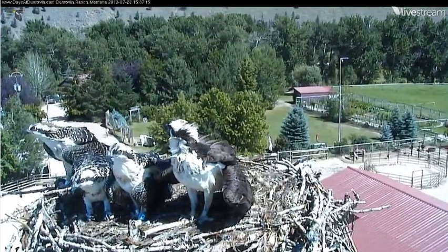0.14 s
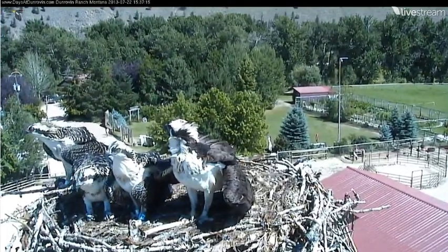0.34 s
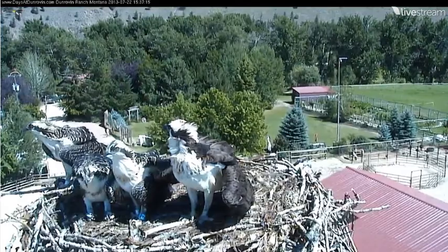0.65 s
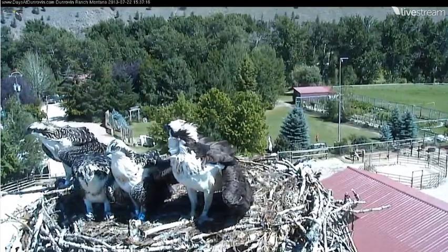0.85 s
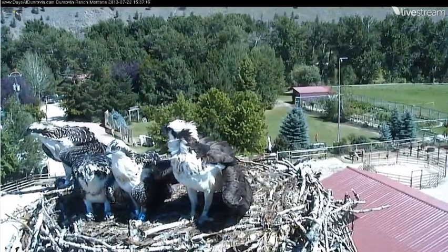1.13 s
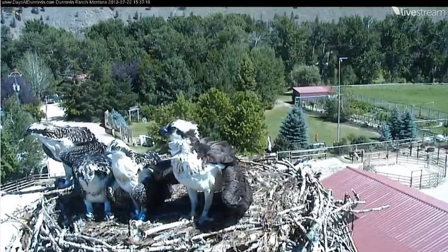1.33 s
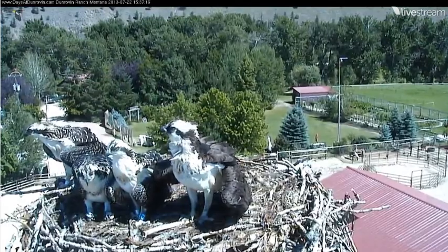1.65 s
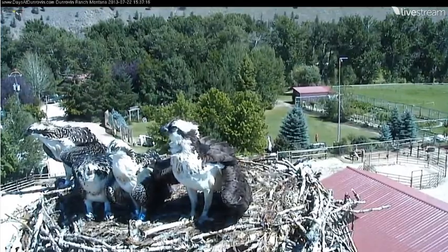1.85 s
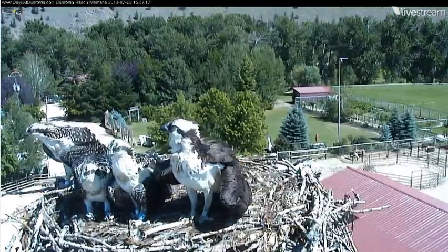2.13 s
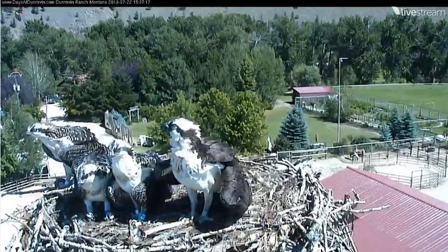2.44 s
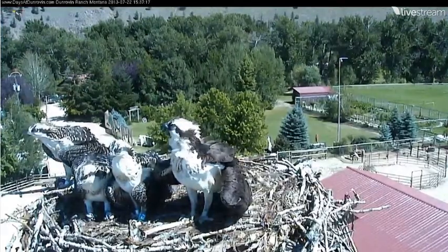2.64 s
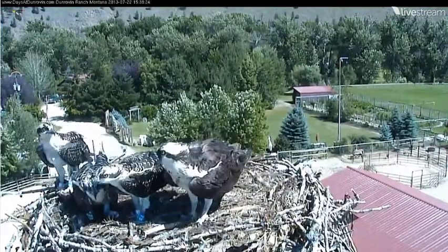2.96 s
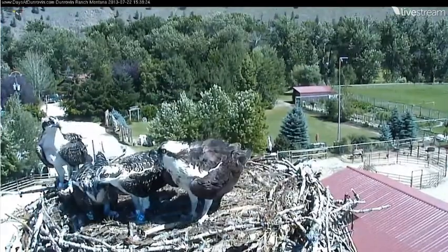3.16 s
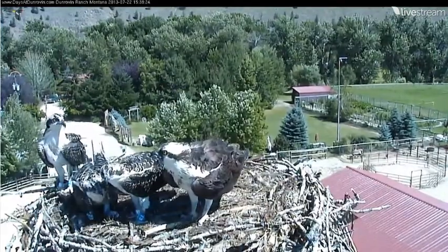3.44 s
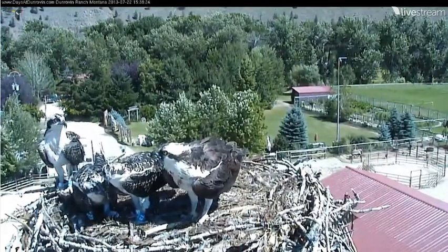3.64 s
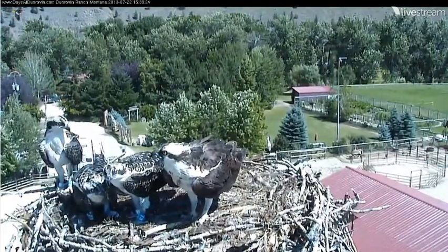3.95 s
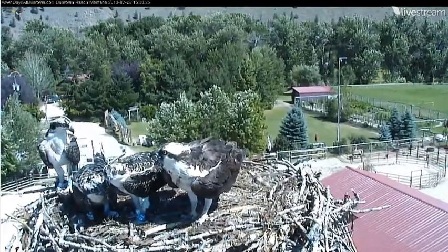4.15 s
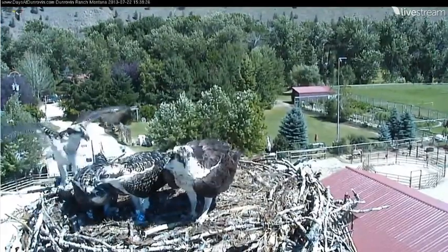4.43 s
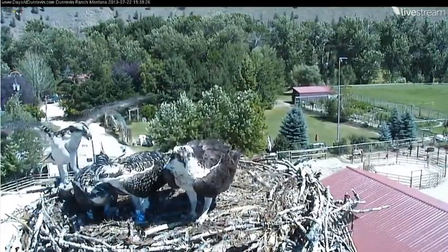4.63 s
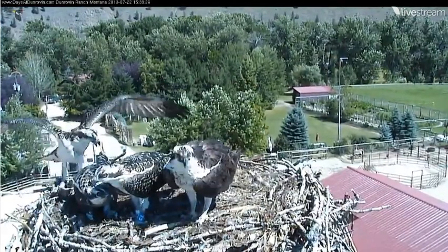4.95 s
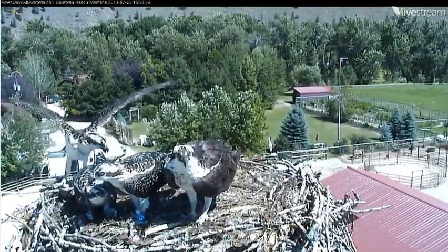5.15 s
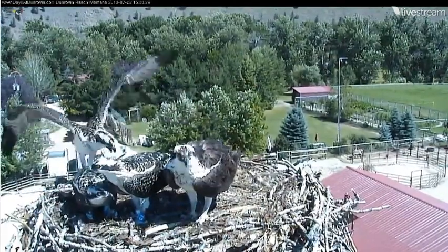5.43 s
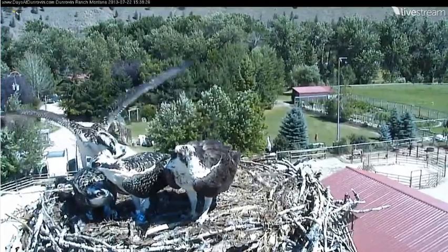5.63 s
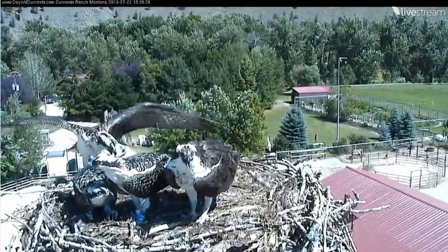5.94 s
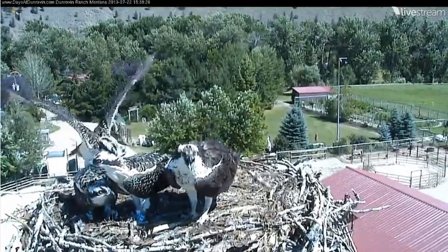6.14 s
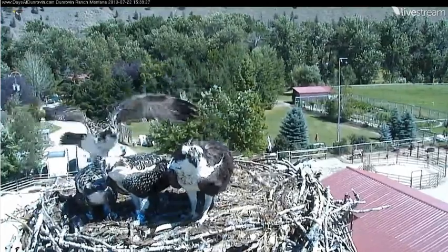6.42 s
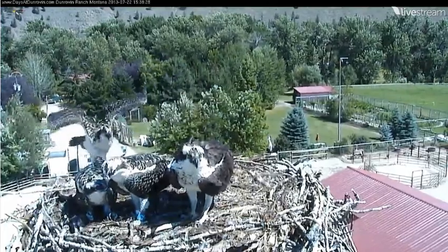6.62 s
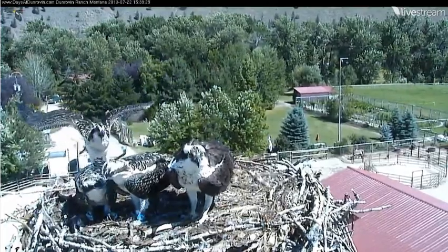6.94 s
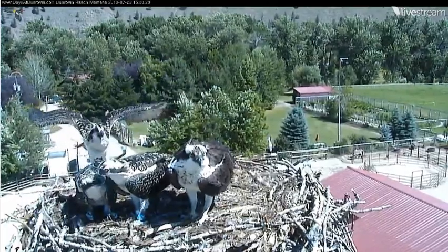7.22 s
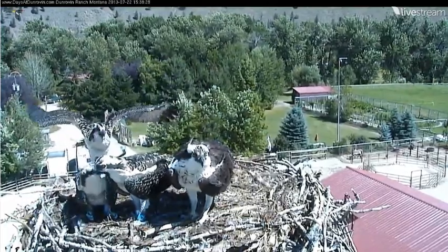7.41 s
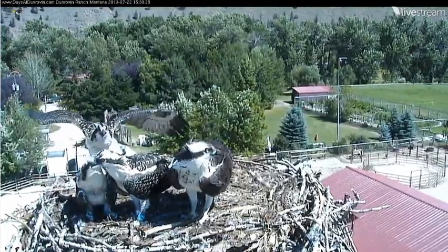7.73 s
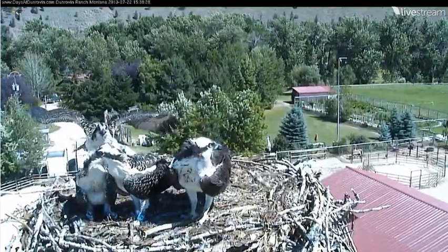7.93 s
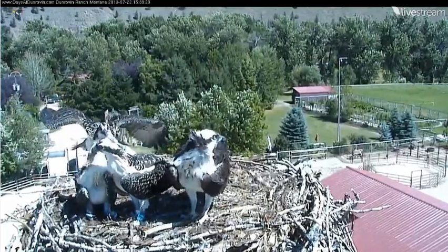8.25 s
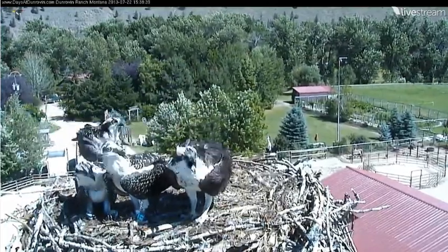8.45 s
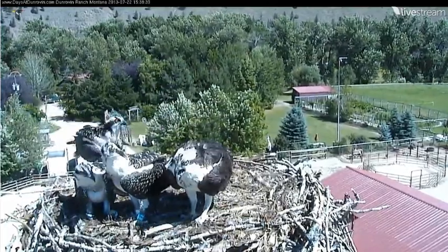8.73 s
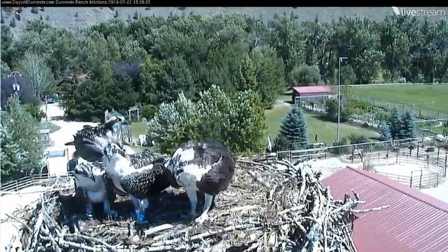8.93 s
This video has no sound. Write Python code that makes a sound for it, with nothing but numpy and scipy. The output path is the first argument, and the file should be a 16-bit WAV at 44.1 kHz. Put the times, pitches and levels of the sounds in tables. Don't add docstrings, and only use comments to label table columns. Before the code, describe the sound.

A breezy outdoor nest heard through a thin, easily overloaded camera microphone: constant grainy leaf hiss, faint mains hum, low gusts. From 0 to 3 s it is sparse: a close sparrow on the left gives quick burred zigzag chirps at about 0.6 and 0.9, a loud one at 1.7, its strongest at 2.6 with a faint reply, while distant twitters and two very faint thin trills pass. At 3.2 an osprey beside the left side gives one sharp whistle; from about 3.6 short falling whistles run at six per second, first a hoarser young bird, then from 4.7 a harder adult with small peeps between, then the young again from 5.9 to 6.9, its voice cracking higher. Wind thumps softly around 3.5, 5.5 and 7.1. After a brief gap, the adult starts again at 7.1, its piercing, distorted whistles rising slightly and growing harder until 9 s. Far sparrows twitter throughout.

```python
import sys
import numpy as np
from scipy import signal
from scipy.fft import rfft, irfft, next_fast_len
from scipy.io import wavfile
from scipy.ndimage import uniform_filter1d

SR = 44100
rng = np.random.default_rng(int(sys.argv[2]) if len(sys.argv) > 2 else 0)


def bounce(signal):
    frames = np.transpose(np.atleast_2d(signal))
    limited = np.clip(frames, -1, 1)
    pcm = np.round(limited * 32767).astype(np.int16)
    wavfile.write(sys.argv[1], SR, pcm)


def makeup_ratio(level_db):
    decades = np.asarray(level_db, float) / 20
    return 10 ** decades


N = 400428
T = np.arange(N) / SR

# pitch_hz, level_db
HUM_TONES = [(120.1, -34), (240.1, -38), (360.1, -44.5), (515.8, -49), (1091.6, -43.5)]
# frequency_hz, density_db
LEAVES_LEFT = [(30, -5.5), (150, -3.5), (500, -10), (1300, -8.5), (2500, -1.5), (3400, -2.5), (4200, -14),
               (5500, -16)]
# frequency_hz, density_db
LEAVES_RIGHT = [(30, -24), (150, -7.5), (500, -9.5), (1300, -6.5), (2400, -6.5), (3200, -13), (4200, -22),
                (5500, -12)]
# frequency_hz, correlation (-1 to 1)
LEAVES_LIKENESS = [(60, -2.5), (180, 0.66), (550, 0.97), (1640, 0.9), (4950, 0.38), (14900, -0.25)]
# time_s, level_db
GUSTS = [(0.0, -49), (0.05, -56), (0.43, -45), (2.98, -52.5), (3.49, -34), (4.88, -32.5), (5.36, -29),
         (5.66, -42), (5.71, -29), (5.87, -41), (6.04, -39.5), (7.03, -43), (7.1, -26), (7.18, -32),
         (8.27, -37.5), (8.32, -47), (9.0, -31.5), (9.08, -40)]
# start_s, length_s, level_db
FAR_CHIRPS = [(0.156, 0.08, -34.5), (1.229, .12, -39), (2.419, .12, -38.5), (3.028, 0.047, -34),
              (3.463, 0.047, -35.5), (3.685, .079, -31.5), (4.036, 0.042, -28.5), (4.316, 0.028, -31.5),
              (4.804, 0.064, -30.5), (5.232, 0.098, -30), (5.597, 0.032, -24), (5.693, 0.12, -31),
              (6.106, 0.032, -30), (6.55, 0.087, -41), (6.627, 0.035, -31), (6.823, 0.018, -24),
              (6.874, 0.05, -32), (7.248, 0.021, -22), (7.405, 0.1, -41), (7.544, 0.072, -49),
              (7.685, 0.049, -43), (7.918, 0.027, -26), (8.108, 0.017, -26), (8.579, 0.062, -23),
              (8.719, 0.086, -27.5), (8.826, 0.027, -27.5)]
# start_s, length_s, pitch_hz, level_db
FAR_TRILLS = [
    (0.326, 0.23, 7830, -49.5),
    (2.31, 0.26, 7800, -50.5),
]
# time_s, pitch_hz, level_db
ZIGZAG_CURVE = [
    (0, 3400, -22),
    (.027, 3714, -16),
    (.043, 6150, -15),
    (.058, 5720, -18),
    (.086, 3000, -14),
    (.098, 3800, -10),
    (.112, 3050, -9),
    (.148, 4380, -11.5),
    (.168, 3075, -19),
]
# time_s, pitch_hz, level_db
SHOUT_CURVE = [
    (0, 4674, -6),
    (.017, 4500, -14),
    (0.03, 3265, 11),
    (0.04, 4260, -11),
    (0.043, 3033, -2),
    (0.066, 3836, 1.5),
    (.089, 2500, -2),
    (0.099, 3185, -2.5),
    (0.123, 2480, -19),
]
# start_s, length_s, level_db
ZIGZAG_CALLS = [
    (.636, 0.19, 0.5),
    (.891, .13, -8),
    (2.59, .168, 2),
    (2.787, 0.18, -12),
]
# start_s, length_s, top_hz, end_hz, chest_note_s (0 = none)
ADULT_CALLS = [(3.175, 0.066, 2676, 2476, 0), (4.679, 0.068, 2645, 2400, 0),
               (4.838, 0.063, 2826, 2563, 0.0094), (4.998, 0.058, 2904, 2553, 0.013),
               (5.16, 0.057, 2830, 2580, .013), (5.328, 0.067, 2780, 2670, 0.009),
               (5.515, 0.058, 2814, 2594, 0.016), (5.73, 0.051, 2706, 2522, 0.017),
               (7.103, 0.063, 2652, 2370, 0), (7.259, 0.064, 2790, 2520, 0.012),
               (7.417, 0.062, 2896, 2512, 0.012), (7.581, 0.058, 2833, 2610, 0.016),
               (7.743, 0.062, 2896, 2710, .011), (7.911, 0.07, 2913, 2557, 0.011),
               (8.088, 0.057, 2942, 2790, 0.02), (8.256, 0.061, 2960, 2750, 0.0084),
               (8.427, 0.065, 2960, 2804, 0.0096), (8.606, 0.064, 3037, 2837, 0.011),
               (8.784, 0.06, 3059, 2790, 0.018), (8.96, 0.061, 3046, 2953, 0.019)]
# start_s, length_s, middle_hz, level_db
PEEP_CALLS = [
    (3.573, 0.052, 2556, -5),
    (4.732, 0.041, 3110, 2.5),
    (4.897, .044, 3250, -10),
    (5.067, 0.054, 3120, -11),
    (5.229, 0.059, 3180, -10),
    (5.41, .062, 3146, -5),
    (5.592, 0.062, 2960, -5.5),
    (5.776, 0.048, 3035, -4.5),
]
# start_s, length_s, top_hz, end_hz
YOUNG_CALLS = [(3.738, 0.052, 2880, 2523), (3.895, 0.055, 2923, 2685), (4.06, 0.049, 2927, 2620),
               (4.231, 0.049, 3004, 2635), (4.392, 0.042, 3070, 2715), (4.559, 0.05, 3115, 2870),
               (5.941, 0.066, 3010, 2585), (6.103, 0.071, 3085, 2690), (6.273, .074, 3197, 2666),
               (6.445, 0.07, 3220, 2646), (6.618, 0.073, 3200, 2804), (6.802, 0.071, 2990, 2733)]
# start_s, length_s, upper_pitch_hz, level_db, whistle_dip_db
VOICE_BREAKS = [
    (4.867, .026, 3570, 3, -5),
    (5.024, 0.022, 3680, -4, -6),
    (6.301, 0.017, 3750, 6, -17),
    (6.476, .014, 3800, 8, -9),
    (6.656, .008, 3700, 4, -7),
    (7.28, .022, 3530, -1, 0.5),
    (7.44, 0.029, 3660, -2, 0),
]
# frequency_hz, level_db
RIGHT_SHADOW = [(1800, -79), (2200, -17), (2700, -36.5), (3300, -38.5), (4500, -30)]
# time_s, level_db
OVERLOAD_LEVEL = [(0, -1), (2.9, 10), (3.1, 0), (4.5, 0), (5.0, -1.5), (9.08, -1.5)]
# frequency_hz, density_db
CAMERA_HISS = [(4000, -3), (5200, 1.5), (6300, -2.5), (7500, -7.5), (9000, -11), (12800, -8), (13300, -46)]
# frequency_hz, step_db
LINK_STEP = [(200, -20.5), (2000, -26), (3300, -12), (4700, 2.5), (7500, 1), (12300, 7.5), (13900, -17),
             (15000, 15)]


def evened(x):
    return x / np.sqrt(np.mean(x ** 2) + 1e-20)


def read(points, hz):
    f, value = np.transpose(points)
    return np.interp(np.log(hz + 1), np.log(f + 1), value)


def add(mix, s, sound):
    part = mix[round(s * SR):][:len(sound)]
    part += sound[:len(part)]


def low(x, hz, size):
    taps = signal.firwin(size, hz, window=("kaiser", 6), fs=SR)
    return signal.oaconvolve(x, taps[None], "same")


def coloured(x, points):
    size = next_fast_len(N)
    gain = makeup_ratio(read(points, np.fft.rfftfreq(size, 1 / SR)))
    return irfft(rfft(x, size) * gain, size)[..., :N]


def noise(left, right, same, patchy_db):
    hz = np.fft.rfftfreq(1024, 1 / SR)
    a, b, c, d, patches = rng.standard_normal((N // 256 + 5, 513, 5)).T
    patches = uniform_filter1d(patches, size=10, axis=0)
    patches = evened(uniform_filter1d(patches, size=14, axis=1))
    like = np.clip(read(same, hz), -1, 1)[:, None]
    shared, own = a + 1j * b, c + 1j * d
    z = np.array([shared, like * shared + np.sqrt(1 - like ** 2) * own])
    shape_db = np.array([read(left, hz), read(right, hz)])[..., None]
    z *= makeup_ratio(shape_db + patchy_db * patches)
    return evened(signal.istft(z, nperseg=1024, noverlap=768)[1][:, :N])


def hum():
    tones = np.zeros(N)
    for hz, db in HUM_TONES:
        tones += np.sqrt(2) * makeup_ratio(db) * np.sin(2 * np.pi * (hz * T + rng.random()))
    return tones * makeup_ratio(np.array([[-1.5], [1.5]]))


def leaves():
    return makeup_ratio(-21) * noise(LEAVES_LEFT, LEAVES_RIGHT, LEAVES_LIKENESS, 0.75)


def wind():
    shape = [(15, -6.5), (40, -5), (100, 3.0), (250, -8.5), (600, -42)]  # frequency_hz, density_db
    likeness = [(25, 0.049), (100, 0.85), (300, 1.0)]
    gust_db = np.interp(T, *np.transpose(GUSTS)) + 2.5
    return makeup_ratio(gust_db) * noise(shape, shape, likeness, 3.7)


def twitter():
    out = np.zeros(N)
    early_hz, late_hz = 4427, 3250
    for s, length, db in FAR_CHIRPS:
        rate, start = rng.random(2)
        t = np.arange(0, length + 0.078, 1 / SR)
        wobble, burr = uniform_filter1d(rng.standard_normal((2, 12000)), size=130)[:, :len(t)]
        hz = early_hz + (late_hz - early_hz) * t / t[-1] + 180 * evened(wobble)
        hz += 450 * np.sin(2 * np.pi * ((25 + 25 * rate) * t + start))
        tone = (1.88 + evened(burr)) * np.sin(2 * np.pi * np.cumsum(hz) / SR)
        add(out, s - .015, makeup_ratio(db - 2.0) * tone * signal.windows.tukey(len(t), .6))
    return out


def trills():
    out = np.zeros(N)
    for s, length, pitch_hz, db in FAR_TRILLS:
        t = np.arange(0, length, 1 / SR)
        beat = 2 * np.pi * 52 * t
        hz = pitch_hz + 330 * np.sin(beat) - 900 * t
        tone = np.sin(2 * np.pi * np.cumsum(hz) / SR)
        add(out, s, makeup_ratio(db) * tone * (1 + 0.9 * np.cos(beat)) * signal.windows.tukey(len(t), .4))
    return out


def chirp(curve, length, db):
    catch_s, depth_db = .003, -12
    at, hz, level_db = np.transpose(curve)
    t = np.arange(0, length, 1 / SR)
    waver, burr = uniform_filter1d(rng.standard_normal((2, len(t))), size=60)
    pitch = uniform_filter1d(np.interp(t, at, hz), size=90) * (1 + 0.014 * evened(waver))
    turn = 2 * np.pi * np.cumsum(pitch) / SR
    tone = (np.sin(turn) + makeup_ratio(-44) * np.sin(2 * turn)) * (1 + .12 * evened(burr))
    bottoms = at[1:-1][(hz[1:-1] < hz[:-2]) & (hz[1:-1] < hz[2:])]
    catch_db = depth_db * np.exp(-((t[:, None] - bottoms) / catch_s) ** 2).sum(1)
    loudness = np.sqrt(2) * makeup_ratio(db + np.interp(t, at, level_db) + catch_db)
    return loudness * tone * signal.windows.tukey(len(t), .06)


def sparrow():
    out = np.zeros(N)
    for s, length, db in ZIGZAG_CALLS:
        add(out, s, chirp(ZIGZAG_CURVE, length, db))
    add(out, 1.72, chirp(SHOUT_CURVE, SHOUT_CURVE[-1][0], 0))
    return out


def note(length, start_hz, mid_hz, end_hz, db, octave_db, fade, waver=0.0039, droop=0):
    droop_s = .009
    u = np.linspace(0, 1, round(length * SR))
    hz = start_hz * (1 - u) * (1 - 2 * u) + 4 * mid_hz * u * (1 - u) + end_hz * u * (2 * u - 1)
    hz *= 1 - droop * np.exp((u - 1) * length / droop_s)
    drift = evened(uniform_filter1d(rng.standard_normal(len(u)), size=60))
    turn = 2 * np.pi * np.cumsum(hz * (1 + waver * drift)) / SR
    edge = np.clip(np.minimum(u, 1 - u) * length / fade, 0, 1)
    tone = np.sin(turn) + makeup_ratio(octave_db) * np.sin(2 * turn)
    return np.sqrt(2) * makeup_ratio(db) * tone * np.sin(np.pi / 2 * edge) ** 2


def adult_calls(out):
    for s, length, top_hz, end_hz, chest in ADULT_CALLS:
        rise = .035 if chest else 0.094
        db = 3.5 + 14.5 * (top_hz - 2800) / 1000
        if not chest:
            db += 4
        arc = note(length + .015, top_hz * (1 - rise), top_hz, end_hz, db, -30, .007, .008, droop=.07)
        add(out, s - .003, arc)
        if chest:
            hz = .735 * top_hz
            low_hz, high_hz = hz * (1 - .085), hz * (1 + .085)
            add(out, s - chest - .005, note(chest + .009, low_hz, hz, high_hz, 0, -16.5, 0.0088, .008))
            octave_hz = 2 * low_hz
            flash = note(.011, octave_hz, octave_hz * 1.04, octave_hz * 1.09, -2.5, -42, 0.0036, 0.011)
            add(out, s - chest - .003, flash)


def young_calls(out):
    open_s, close_s = .017, .014
    for s, length, top_hz, end_hz in YOUNG_CALLS:
        add(out, s - .003, note(length + .007, top_hz * .9, top_hz, end_hz, 6, -26, 0.0056, .015, droop=.03))
        add(out, s - open_s, note(open_s + .003, 1800, 1950, 2150, -14.5, 1.6, 0.004, 0.039))
        add(out, s + length - .001, note(close_s, 2080, 1930, 1900, -17, 5, 0.0048, 0.039))


def peeps(out):
    for s, length, mid_hz, db in PEEP_CALLS:
        peep = note(length, mid_hz * .97, mid_hz, mid_hz * .9, db, -17.5, 0.0084, 0.012)
        swell_db = -11.5 * np.maximum(np.linspace(1, -1, len(peep)), 0)
        add(out, s, peep * makeup_ratio(swell_db))


def broken_voice(whistles):
    scoop = .985
    dip_db, upper = np.zeros(N), np.zeros(N)
    for s, length, hz, db, dip in VOICE_BREAKS:
        add(dip_db, s, np.full(round(length * SR), float(dip)))
        add(upper, s - .002, note(length + .004, hz * scoop, hz, hz, db, -40, 0.006, 0.012))
        above = hz * 1.2
        add(upper, s, note(length, above * scoop, above, above, db - 6, -30, 0.0044, .02))
    return whistles * makeup_ratio(uniform_filter1d(dip_db, size=130)) + upper


def ospreys():
    whistles = np.zeros(N)
    adult_calls(whistles)
    young_calls(whistles)
    peeps(whistles)
    return broken_voice(whistles)


def yard(x, t60, echo_s, echo_db, tail_db):
    t = np.arange(SR // 2) / SR
    sparse = rng.random((2, len(t))) < .03
    taps = rng.standard_normal((2, len(t))) * sparse * makeup_ratio(-60 * t / t60) * (t > .004)
    taps *= makeup_ratio(tail_db) / np.linalg.norm(taps[0])
    taps[:, round(echo_s * SR)] += makeup_ratio(echo_db)
    return signal.oaconvolve(x[None], taps, axes=1)[:, :N]


def scene():
    nest, small, far = ospreys(), sparrow(), twitter()
    left = nest + small
    wet = yard(nest, 0.064, 0.12, -32, -26) + yard(small, 0.2, 0.016, -10.0, -10.0)
    trailing = np.roll(left, shift=5)
    mix = np.array([trailing + wet[0], coloured(left, RIGHT_SHADOW) + makeup_ratio(-16) * wet[1]])
    mix += far * makeup_ratio(np.array([[3], [-3]])) + yard(far, 0.029, 0.049, -17.0, -5.0)
    return mix + leaves() + hum() + wind() + makeup_ratio(40) * trills()


def ragged(x, depth, hz):
    grain = evened(low(rng.standard_normal(x.shape), hz, size=101))
    return x * (1 + depth * grain * uniform_filter1d(abs(x), size=200))


def slow_sampling(dry, top):
    step = 4
    guarded = low(dry, 5055, size=201)
    railed = np.clip(guarded, -1.2 * top, 0.81 * top)
    railed -= uniform_filter1d(railed - guarded, size=60)
    kept = np.zeros_like(dry)
    kept[:, ::step] = step * ragged(railed, .1, 2200)[:, ::step]
    return low(kept, 5600, size=71)


def camera_link(x, spread_db, patchy_db):
    window = np.sqrt(signal.windows.hann(2048, sym=False))
    hz, _, z = signal.stft(x, SR, window, nperseg=2048, noverlap=1024)
    power = abs(z) ** 2
    masking = uniform_filter1d(power, size=30, axis=1) + makeup_ratio(spread_db) * power.mean(1, keepdims=True)
    whim = np.repeat(rng.standard_normal((43, z.shape[2])), repeats=24, axis=0)[:len(hz)]
    whim = evened(uniform_filter1d(whim, size=2, axis=1))
    step = np.sqrt(abs(masking) + 1e-18) * makeup_ratio(read(LINK_STEP, hz)[:, None] + patchy_db * whim)
    return signal.istft(step * np.round(z / step), SR, window, nperseg=2048, noverlap=1024)[1][:, :N]


def top_cut(x):
    return signal.sosfilt(signal.butter(12, 15520, fs=SR, output="sos"), x)


def record(dry):
    top = makeup_ratio(np.interp(T, *np.transpose(OVERLOAD_LEVEL)))
    smooth = slow_sampling(dry, top)
    rail = 0.76 * top
    loud = ragged(np.clip(smooth, -rail, rail), 0.27, 1400)
    left = loud[:1]
    loud[1] -= makeup_ratio(-14) * (left - low(left, 5500, size=101))[0]
    leak = makeup_ratio(-40) * (dry - low(dry, 7200, size=101)).mean(0)
    hiss = makeup_ratio(-51.5) * noise(CAMERA_HISS, CAMERA_HISS, [(20, 0.58), (20000, 1)], 1.4)
    mix = camera_link(loud + leak + hiss, -60, 4.0)
    return top_cut(mix)


dry = scene()
out = record(dry)
bounce(out)
```